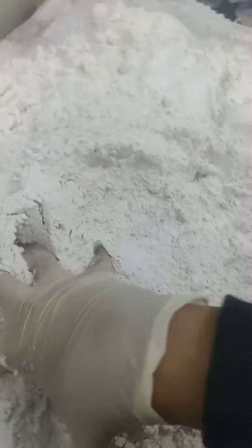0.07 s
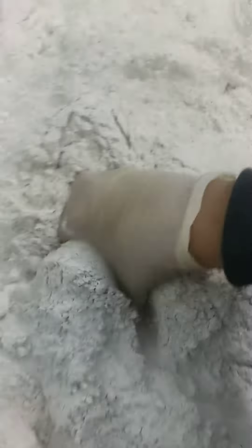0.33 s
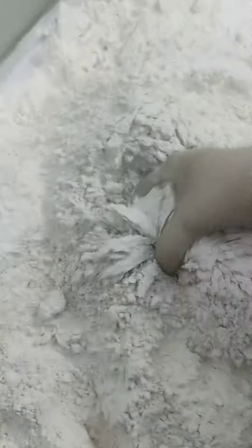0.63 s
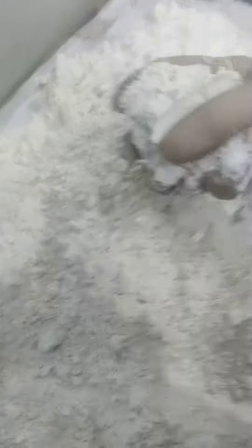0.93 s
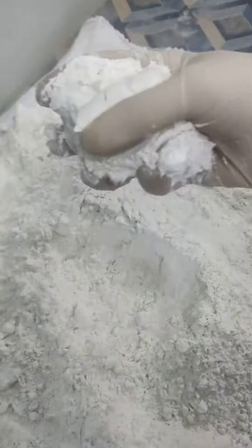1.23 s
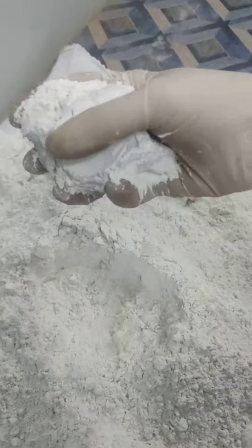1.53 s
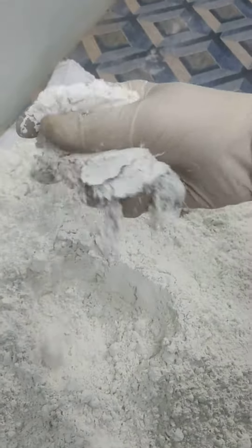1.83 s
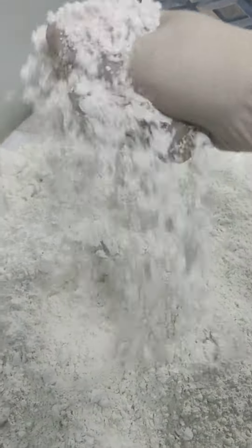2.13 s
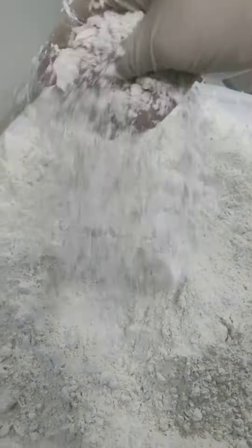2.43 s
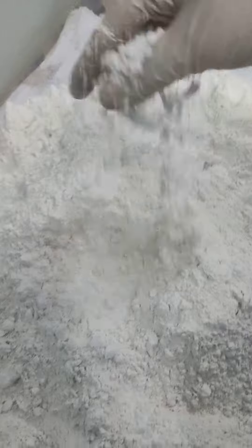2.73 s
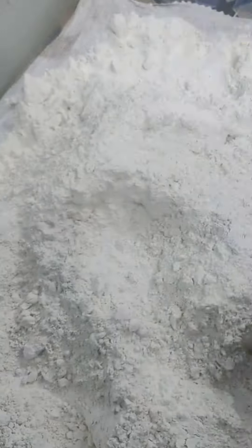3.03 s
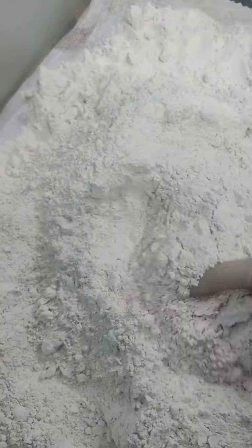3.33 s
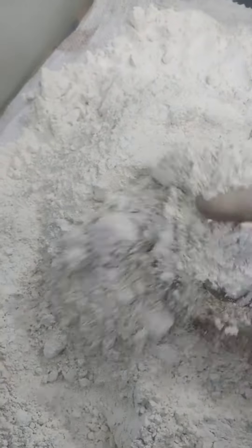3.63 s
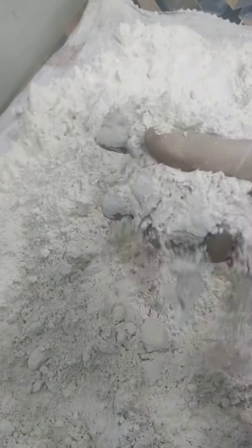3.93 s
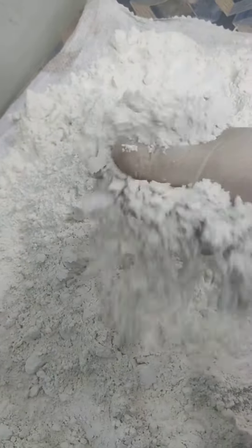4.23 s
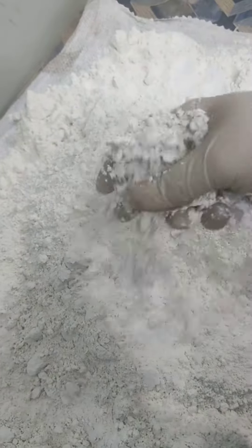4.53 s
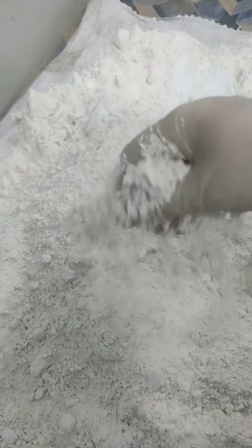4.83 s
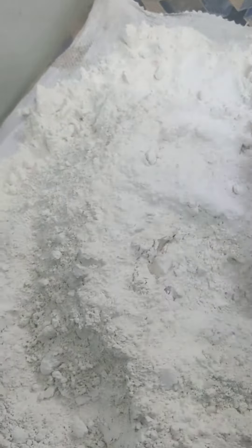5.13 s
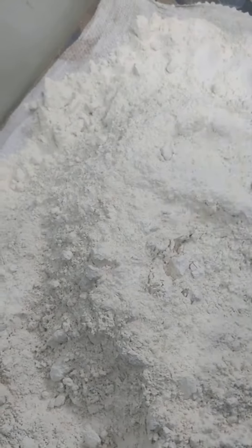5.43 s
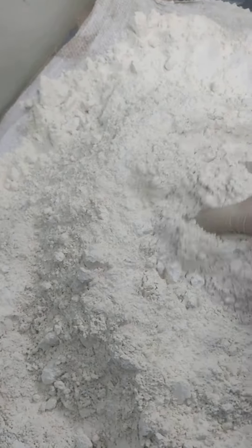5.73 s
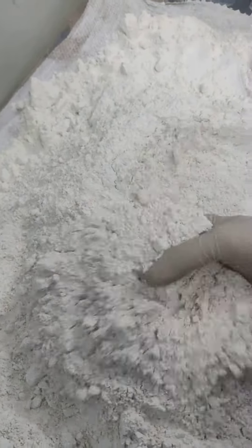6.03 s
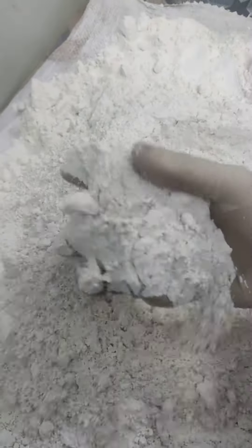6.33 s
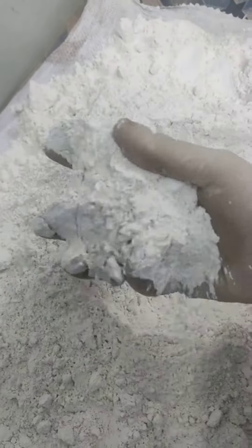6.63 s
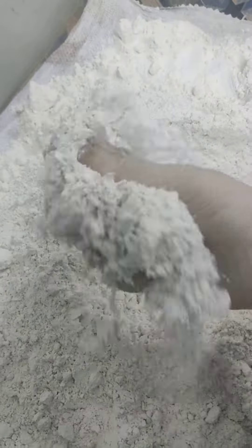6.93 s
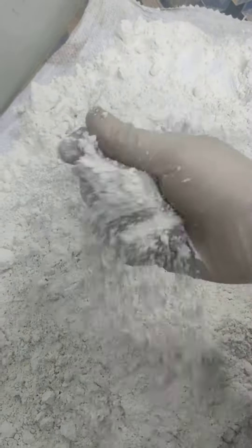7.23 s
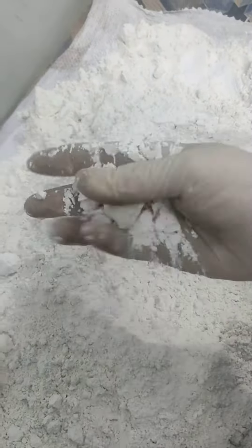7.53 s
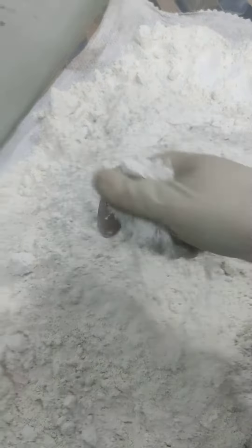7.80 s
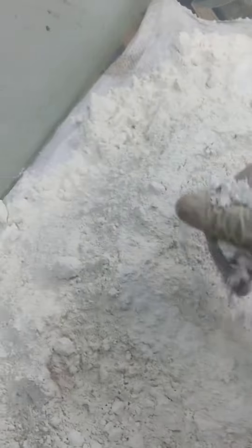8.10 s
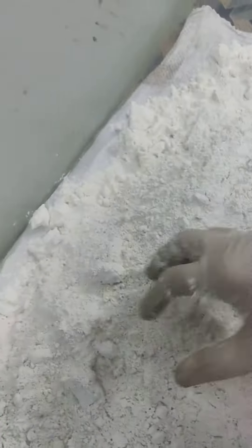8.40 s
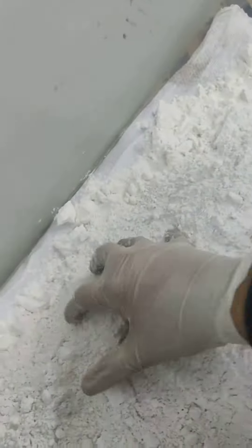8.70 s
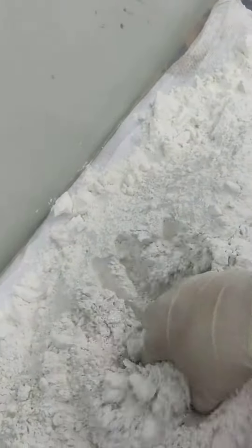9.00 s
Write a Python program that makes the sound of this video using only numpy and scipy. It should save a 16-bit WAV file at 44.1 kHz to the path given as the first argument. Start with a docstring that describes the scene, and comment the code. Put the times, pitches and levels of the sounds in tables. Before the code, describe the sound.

Scratchy, slightly squeaky finger rubs, ticks and dull bumps sound very close on the left microphone at first, then grow sparse. Behind them, fine powder hisses as a gloved hand sweeps through it, and handfuls slide off and land on the heap with a soft rush and little plops. A quick fingernail scrape comes just before a later pour. The setting is a quiet room with a low rumble and faint hum.

```python
"""Soft powder hisses over a low room rumble and hum as a gloved hand digs into a sack.
The hand lifts handfuls and lets them fall: sliding grains hiss, clumps land with a soft rush, lumps plop.
The other hand shifts its grip on a camera: skin and nail rub, bump and tick on the case,
right beside the left microphone."""
import sys
import numpy as np
from scipy import signal
from scipy.fft import rfft, irfft
from scipy.io import wavfile

SR = 44100
rng = np.random.default_rng(int(sys.argv[2]) if len(sys.argv) > 2 else 0)


def master_out(mix):
    """Clip the mix to full scale and print it as 16-bit PCM to the path in sys.argv[1]."""
    frames = np.transpose(np.atleast_2d(mix))
    ceiling = np.clip(frames, -1, 1)
    pcm = np.round(ceiling * 32767).astype(np.int16)
    wavfile.write(sys.argv[1], SR, pcm)


N = 408366
TIME_S = np.arange(N) / SR

# glove sweeps through the powder: peak_s, length_s, hiss_db, shove_db
GLOVE_SWEEPS = [(0.004, 0.14, -51, -49), (0.163, 0.54, -50, -55.5), (0.52, 0.24, -43, -51.5),
                (0.817, 0.45, -48, -62), (1.278, 0.28, -69, -59), (3.252, 0.27, -57, -54.5),
                (3.925, 0.14, -60.5, -66), (5.472, 0.13, -47, -60.5), (5.62, 0.23, -56.5, -62),
                (7.712, 0.097, -51.5, -86), (7.84, 0.47, -57, -85), (8.633, 0.15, -53, -62.5),
                (8.878, 0.87, -58.5, -79)]
# spectrum of powder hitting the heap: freq_hz, density_db
HEAP_SPECTRUM = [(120, -15), (380, 2.5), (560, 3), (760, 2), (950, 2.5), (1130, -3.5), (1400, -4),
                 (2500, -5.5), (3600, -10.5), (9000, -15.5), (15000, -94)]
# spectrum of the case body: freq_hz, density_db
CASE_SPECTRUM = [(60, -47), (200, -2), (350, 5), (600, 4.5), (950, 4.5), (1400, 1), (2100, 3), (2900, 1),
                 (4200, -12.5), (7000, -26), (15000, -103)]
# spectrum of ticks at the microphone port: freq_hz, density_db
TICK_SPECTRUM = [(300, 0.5), (2000, -2), (3500, -2.5), (5000, -0.5), (6500, 7), (7500, 7.5), (8500, 1.5),
                 (10000, -10.5), (15000, -12)]


def amp(db):
    """Decibels to gain."""
    return 10 ** (np.asarray(db) / 20)


def unit_rms(x):
    """Scale to an rms of one."""
    return x / np.sqrt(np.mean(x ** 2) + 1e-20)


def unit_energy(x):
    """Scale to an energy of one."""
    return x / (np.linalg.norm(x) + 1e-12)


def log_interp(table, hz):
    """Interpolate a table on a log-frequency axis."""
    freq_hz, value = np.transpose(table)
    return np.interp(np.log(hz + 1), np.log(freq_hz + 1), value)


def ring(spectrum, hz=1000, width_hz=500, lift_db=0, size=2048):
    """Minimum-phase impulse response of unit energy: a broad spectrum plus one resonance."""
    freq_hz = np.fft.rfftfreq(size, 1 / SR)
    gain = amp(log_interp(spectrum, freq_hz) + lift_db * np.exp(-((freq_hz - hz) / width_hz) ** 2))
    cepstrum = irfft(np.log(gain))
    cepstrum[1:size // 2] *= 2
    cepstrum[size // 2 + 1:] = 0
    return unit_energy(irfft(np.exp(rfft(cepstrum)))[:size // 2])


def tint(x, spectrum):
    """Filter by a spectrum; unit rms."""
    return unit_rms(signal.oaconvolve(x, ring(spectrum))[:N])


def wander(rate_hz):
    """Smooth random curve of bandwidth rate_hz; unit rms."""
    lowpass = np.exp(-(np.fft.rfftfreq(N, 1 / SR) / rate_hz) ** 2)
    return unit_rms(irfft(rfft(rng.standard_normal(N)) * lowpass, N))


def grains(per_s, spread_db):
    """Random impulses, sizes spread exponentially in dB; unit rms."""
    size = amp(spread_db * np.minimum(rng.exponential(1, N), 4))
    polarity = np.sign(rng.standard_normal(N))
    return unit_rms(polarity * size * (rng.random(N) < per_s / SR))


def add(mix, start_s, sound):
    """Mix a sound in at start_s."""
    part = mix[max(round(start_s * SR), 0):][:len(sound)]
    part += sound[:len(part)]


def room(rumble_db=-49, hiss_db=-73.5):
    """Low rumble, largely coherent at the two microphones, plus their own faint hiss."""
    # room rumble: freq_hz, density_db
    rumble_spectrum = [(15, -12), (28, -6.5), (55, 1.5), (78, -1), (100, -2.5), (122, -1), (150, 2),
                       (200, -1), (300, -7), (500, -12.5), (750, -20), (1050, -31), (2000, -32.5),
                       (4000, -67)]
    # likeness of left and right: freq_hz, coherence
    room_coherence = [(20, .72), (60, .96), (170, .95), (290, .78), (640, .5), (1400, 0)]
    # lean of the rumble: freq_hz, left_minus_right_db
    room_balance = [(60, 5.3), (200, 7.1), (700, 4.6), (2400, 1.1)]
    # microphone self-noise: freq_hz, density_db
    hiss_spectrum = [(1000, 4.5), (4000, -3.5), (6000, -9), (7700, -5), (10000, -16), (12500, -16),
                     (15000, -26)]
    freq_hz = np.fft.rfftfreq(N, 1 / SR)
    coherence = log_interp(room_coherence, freq_hz)
    lean_db = log_interp(room_balance, freq_hz) / 2
    left, independent = rfft(rng.standard_normal((2, N)))
    right = coherence * left + np.sqrt(1 - coherence ** 2) * independent
    pair = np.array([left * amp(lean_db), right * amp(-lean_db)])
    rumble = unit_rms(irfft(pair * amp(log_interp(rumble_spectrum, freq_hz)), N))
    hiss = np.array([tint(rng.standard_normal(N), hiss_spectrum) for _ in range(2)])
    return amp(rumble_db) * rumble + amp(hiss_db) * hiss


def hum(waver_db=2.0, drift_rad=0.7, right_db=-6):
    """Wavering mains hum and a few passing low tones."""
    # mains hum: pitch_hz, level_db
    mains_tones = [(99.5, -58), (150, -63.5)]
    # room tones that swell and fade: middle_s, length_s, pitch_hz, level_db
    passing_tones = [(0.86, 0.45, 187.1, -49), (1.3, 4.5, 179, -56.5), (4.424, 0.56, 218.6, -51.5),
                     (6.258, 1.76, 148.1, -51.5), (6.419, 0.38, 126, -49), (9.004, 1.2, 213.8, -52)]
    out = np.zeros(N)
    for hz, db in mains_tones:
        gain = amp(db + waver_db * wander(rate_hz=9.1))
        out += gain * np.sin(2 * np.pi * hz * TIME_S + drift_rad * wander(rate_hz=3.3))
    for middle_s, length_s, hz, db in passing_tones:
        gain = amp(db) * np.cos(np.pi * np.clip((TIME_S - middle_s) / length_s, -.5, .5))
        out += gain * np.sin(2 * np.pi * hz * TIME_S + drift_rad * wander(rate_hz=7.2))
    return np.sqrt(2) * out * amp([[0], [right_db]])


def flow_gain(flows, floor_db, rise_share=0.53, roundness=1.37):
    """Powder flows build and run out, adding in power over a floor of creeping loose powder."""
    power = amp(floor_db) ** 2
    for peak_s, length_s, db in flows:
        away = np.maximum((peak_s - TIME_S) / rise_share, (TIME_S - peak_s) / (1 - rise_share)) / length_s
        gain = amp(db) * np.exp(-np.minimum(away ** roundness, 20))
        power += gain ** 2
    return np.sqrt(power)


def sliding_powder(left_db=-4, waver_db=1.7, crumbs_db=-11.5):
    """Fine grains shear past each other and coarse crumbs tick apart; the flow wavers as lumps break."""
    # powder spilling off the hand: peak_s, length_s, level_db
    pours = [(1.94, 0.23, -57), (2.134, 0.15, -51), (2.357, 0.33, -55), (2.583, 0.34, -56),
             (2.85, 0.57, -57), (4.435, 0.55, -55), (4.76, 0.88, -59), (4.9, 0.23, -56.5),
             (7.07, 0.22, -52.5), (7.266, 0.48, -56.5), (8.146, 0.24, -53)]
    # fine grains: freq_hz, density_db
    fizz_spectrum = [(500, -33), (2000, -14), (4000, -10.5), (5500, -8), (6700, -3), (7700, 3),
                     (8600, -4.5), (9800, -20), (15000, -30)]
    # coarse crumbs: freq_hz, density_db
    crumb_spectrum = [(600, -8), (2000, -3.5), (4700, -1.5), (7500, 6.5), (10000, -15.5), (15000, -23)]
    crumbs = amp(crumbs_db) * tint(grains(per_s=60, spread_db=2.5), crumb_spectrum)
    fizz = np.array([tint(grains(per_s=14000, spread_db=-2.0), fizz_spectrum) for _ in range(2)])
    sweeps = [(peak_s, length_s, hiss_db) for peak_s, length_s, hiss_db, _ in GLOVE_SWEEPS]
    gain = flow_gain(sweeps + pours, floor_db=-71) * amp(waver_db * wander(rate_hz=21))
    return (fizz + crumbs) * gain * amp([[left_db], [0]])


def clump_gain(crumble_s=0.0044, steady_share=0.65):
    """Clumps land at random and crumble at once, over a steady stream."""
    decay = np.exp(-TIME_S[:SR // 20] / crumble_s)
    power = signal.oaconvolve(abs(grains(per_s=55, spread_db=-3.0)), decay)[:N]
    return np.sqrt(steady_share + (1 - steady_share) * abs(power) / power.mean())


def falling_powder(left_db=1, right_db=-1.5, waver_db=1.46, coarse_db=-6):
    """Shoved or dropped powder patters on the heap in soft clumps, without ringing."""
    # spilled powder reaching the heap: peak_s, length_s, level_db
    landings = [(2.07, 0.2, -58.5), (2.256, 0.44, -53.5), (2.45, 0.68, -69), (2.667, 0.44, -52),
                (2.956, 0.2, -64), (4.38, 0.72, -57), (4.526, 0.19, -51.5), (4.663, 0.07, -59),
                (5.046, 0.12, -54), (7.177, 0.061, -47), (7.247, 0.18, -51), (7.343, 0.093, -58),
                (8.128, 0.057, -72), (8.262, .07, -61.5)]
    patter = np.zeros((2, N))
    for side in patter:
        fine = grains(per_s=3500, spread_db=1.5)
        coarse = amp(coarse_db) * grains(per_s=110, spread_db=5.5)
        side += tint(fine + coarse, HEAP_SPECTRUM)
    shoves = [(peak_s, length_s, shove_db) for peak_s, length_s, _, shove_db in GLOVE_SWEEPS]
    gain = flow_gain(shoves + landings, floor_db=-72) * clump_gain() * amp(waver_db * wander(rate_hz=23))
    return patter * gain * amp([[left_db], [right_db]])


def resting_finger(body_db=-69, tick_db=-76):
    """A resting finger creeps on the case with a faint crackle."""
    creep = grains(per_s=300, spread_db=3)
    return amp(body_db) * tint(creep, CASE_SPECTRUM) + amp(tick_db) * tint(creep, TICK_SPECTRUM)


def grip_at(time_s):
    """The grip sets the resonance of the hollow under the finger, the scratch and the ticks' top octave."""
    # seat of the finger on the case: time_s, hollow_db, scratch_trim_db, top_octave_db
    grips = [(.13, 1.5, -2.5, 0), (.4, 8.5, -2, 7), (.9, 5, -6.5, 0), (1.04, 9, -3.5, 5), (1.2, 8, -6, 2),
             (1.601, 9.5, -4, -12), (1.8, 7.5, -4, 9), (2.3, 7.5, -6.5, -3), (2.6, 5, -2, -4),
             (2.9, 5.5, -8.5, 5), (3.7, 1.5, -4.5, -5), (5.4, 2, 0, -2), (6.2, 1, -2, -3), (6.8, 8, -2, 6),
             (8.7, -3, 8, 5)]
    times_s, *columns = np.transpose(grips)
    return [np.interp(time_s, times_s, column) for column in columns]


def disperse(response, travel_s, knee_hz=1300):
    """Low tones cross the case more slowly than high ones, so each slip chirps downward."""
    size = 2 * len(response)
    delay_s = travel_s * np.exp(-np.fft.rfftfreq(size, 1 / SR) / knee_hz)
    lag_turns = np.cumsum(delay_s) * SR / size
    return irfft(rfft(response, size) * np.exp(-2j * np.pi * lag_turns))


def resonate(x, hz, width_hz):
    """Narrow resonance following the pitch curve hz."""
    carrier = np.exp(2j * np.pi * np.cumsum(hz) / SR)
    pole = np.exp(-np.pi * width_hz / SR)
    return 2 * (carrier * signal.lfilter([1 - pole], [1, -pole], x / carrier)).real


def finger_rubs(body_db=-1.5, scratch_db=-3.5, squeak_db=-14, squeak_sag=0.16, waver_db=1.93,
                snag_db=-3, slip_share=0.43, rise_share=0.62, linger_s=0.02):
    """Skin sticks and slips: it rings the case, squeaks in the finger's hollow, scratches at the port."""
    # finger strokes on the case: middle_s, length_s, level_db, hollow_hz
    strokes = [(0.13, 0.073, -34.5, 900), (0.208, 0.053, -33.5, 1240), (0.246, 0.059, -30, 1460),
               (0.298, 0.038, -24, 1400), (0.347, 0.025, -37, 1350), (0.387, 0.039, -22, 1320),
               (0.441, 0.043, -31.5, 1370), (0.528, 0.049, -32, 1490), (0.587, 0.052, -26, 1440),
               (0.641, 0.022, -35, 1600), (0.671, 0.028, -26.5, 1450), (0.688, 0.016, -32.5, 1390),
               (0.71, 0.033, -35, 1300), (0.747, 0.041, -30, 1500), (0.796, 0.022, -32.5, 1400),
               (0.817, 0.031, -24, 1320), (0.862, 0.045, -27, 1520), (0.91, 0.032, -34, 1440),
               (0.941, 0.016, -33, 1350), (0.954, 0.02, -22.5, 1430), (1, 0.046, -22, 1380),
               (1.024, 0.031, -24, 1300), (1.05, 0.028, -22, 1430), (1.074, 0.054, -32.5, 1060),
               (1.153, 0.078, -29.5, 1040), (1.222, 0.028, -28.5, 1030), (1.281, 0.044, -40, 990),
               (1.33, 0.036, -37.5, 1150), (1.39, 0.0061, -46, 1400), (1.421, 0.037, -43.5, 1300),
               (1.492, 0.033, -36, 1210), (1.549, 0.046, -45.5, 1340), (1.6, 0.04, -36.5, 1180),
               (1.654, 0.062, -42.5, 1360), (1.689, 0.05, -34, 1400), (1.8, 0.069, -42.5, 1660),
               (1.889, 0.007, -32, 1570), (1.935, 0.026, -44, 1520), (1.999, 0.009, -45.5, 1580),
               (2.163, 0.015, -51, 1550), (2.271, 0.059, -45, 1490), (2.367, 0.03, -36.5, 1470),
               (2.532, 0.03, -35, 1400), (2.601, 0.023, -40, 1590), (2.628, 0.026, -35.5, 1230),
               (2.661, 0.03, -39.5, 1610), (2.72, 0.02, -49, 1450), (2.778, 0.057, -41, 1290),
               (2.836, 0.046, -39.5, 1140), (2.888, 0.037, -39.5, 1230), (2.95, 0.028, -42.5, 1210),
               (3.063, 0.031, -44, 1280), (3.16, 0.035, -47, 1370), (3.421, 0.035, -41.5, 1260),
               (3.545, .032, -40.5, 1270), (3.592, 0.015, -48, 1300), (3.673, 0.017, -38.5, 1750),
               (3.702, 0.028, -39.5, 1600), (3.8, 0.049, -44, 1490), (3.927, 0.043, -46, 1380),
               (4.897, 0.022, -46, 1400), (5.42, 0.056, -46.5, 1540), (5.796, 0.011, -50, 1600),
               (5.847, 0.032, -48, 1400), (5.966, 0.021, -51.5, 1500), (8.418, 0.041, -55.5, 1380)]
    friction = amp(waver_db * wander(rate_hz=68))
    slips = unit_rms(grains(per_s=2200, spread_db=1.5) * friction)
    grit = grains(per_s=4500, spread_db=7.0)
    snags = amp(snag_db) * grains(per_s=330, spread_db=2.0)
    roughness = unit_rms((grit + snags) * friction)
    scratch = tint(np.sqrt(slip_share) * slips + np.sqrt(1 - slip_share) * roughness, TICK_SPECTRUM)
    out = np.zeros(N)
    for middle_s, length_s, db, hz in strokes:
        start_s = max(middle_s - length_s / 2, 0)
        span = slice(int(start_s * SR), int((start_s + length_s + linger_s) * SR))
        corners_s = [0, rise_share * length_s, length_s, length_s + linger_s]
        pressure = np.interp(TIME_S[span] - start_s, corners_s, [0, 1, 0.077, 0]) ** 0.68
        hollow_db, scratch_trim_db, _ = grip_at(middle_s)
        case = disperse(ring(CASE_SPECTRUM, hz, width_hz=640, lift_db=hollow_db), travel_s=0.00402)
        creak = signal.fftconvolve(slips[span] * pressure, case)
        progress = np.minimum(TIME_S[:len(creak)] / length_s, 1) - .5
        squeak = resonate(creak, hz * (1 - squeak_sag * progress), width_hz=270)
        body = unit_energy(creak) + amp(squeak_db + hollow_db) * unit_energy(squeak)
        rasp = unit_energy(scratch[span] * pressure)
        strength = amp(db) * np.linalg.norm(pressure)  # longer strokes carry more energy
        add(out, start_s, strength * amp(body_db) * unit_energy(body))
        add(out, start_s, strength * amp(scratch_db + scratch_trim_db) * rasp)
    return out


def finger_bumps(width_hz=200):
    """Fingertip flesh shudders against the case in short, dull bursts."""
    # fingertip presses: middle_s, length_s, level_db, pitch_hz
    presses = [(0.13, 0.054, -43.5, 414), (0.437, 0.033, -40.5, 395), (1.078, 0.027, -49, 477),
               (1.15, 0.063, -36, 340), (1.214, 0.022, -38, 428), (1.487, 0.0188, -42, 414),
               (1.601, 0.03, -40.5, 433), (3.738, 0.0073, -45, 464), (6.796, .014, -50, 560),
               (6.882, 0.013, -36, 393), (8.99, 0.0095, -42, 395)]
    out = np.zeros(N)
    for middle_s, length_s, db, hz in presses:
        band = signal.butter(2, [hz - width_hz / 2, hz + width_hz / 2], "bandpass", fs=SR, output="sos")
        shudder = signal.sosfilt(band, rng.standard_normal(SR))[-int(length_s * SR):]
        window = signal.windows.tukey(len(shudder), .7)
        add(out, middle_s - length_s / 2, amp(db) * unit_rms(shudder) * window)
    return out


def finger_clicks(knock_gain_db=3.0, skid_db=-14, skid_s=0.005, grit_per_db=0.17, top_octave_hz=9200):
    """A sudden slip ticks at the port and knocks the case while the skin skids to a stop."""
    # single slips and taps: start_s, tick_db, knock_db, knock_hz
    clicks = [(0.2747, -7.5, -9.5, 1300), (0.3059, 3, -6.5, 1090), (.31, -8, -28, 1400),
              (.321, -14, -8, 1680), (0.34, -11, -15, 1510), (0.3939, -12, -3.5, 1160),
              (.734, -8.5, -13, 1490), (0.755, -17, -10.5, 1420), (1.0083, -11, -0.5, 1120),
              (1.0185, -7, -10, 1300), (1.0215, -15, -3, 1400), (1.0493, -18, -1, 1400),
              (1.0543, -10, -9, 1310), (1.071, -13, -11, 1290), (1.1675, -11, -11, 2600),
              (1.185, -19, -28, 1700), (1.191, -18, -5.5, 1240), (1.205, -12, -23, 1500),
              (1.2114, -17, -9.5, 860), (1.227, -30, -19, 2140), (1.278, -10.5, -18.5, 1250),
              (1.314, -13, -16, 1000), (1.3339, -11.5, -17, 1210), (1.415, -21.5, -15.5, 1300),
              (1.5945, -16, -10.5, 1230), (1.724, -7, -12, 1440), (1.7867, -5.5, -20, 2210),
              (1.793, -18, -11.5, 1700), (1.8127, -19, -15, 1450), (2.2659, -19.5, -19, 1600),
              (2.2796, -23, -20, 1600), (2.478, -26, -22.5, 1500), (2.552, -21, -25, 2010),
              (2.695, -26, -14.5, 1370), (3.007, -30, -28, 1400), (3.141, -33, -34, 2200),
              (3.3917, -23, -26, 1500), (3.611, -26.5, -27, 1300), (3.617, -29, -33, 1900),
              (3.6934, -24, -14, 1450), (3.7276, -19.5, -16.5, 900), (3.8145, -27, -22.5, 2100),
              (3.8394, -30, -28, 1100), (4.6185, -30, -25.5, 900), (4.705, -27, -50, 1400),
              (5.304, -21.5, -23.5, 1360), (5.7552, -30, -29.5, 1700), (5.967, -44, -27, 1800),
              (6.1862, -28, -27.5, 1400), (6.2401, -24, -36, 2000), (6.4846, -29, -43, 1500),
              (6.6583, -29, -37, 1500), (6.8809, -24, -18, 1000), (7.7744, -22.5, -50, 1400),
              (8.7118, -24.5, -32.5, 1400), (8.7951, -24.5, -47, 1400)]
    out = np.zeros(N)
    chatter = grains(per_s=5100, spread_db=6.5)
    decay = np.exp(-TIME_S[:SR // 20] / skid_s)
    for start_s, tick_db, knock_db, knock_hz in clicks:
        hollow_db, _, top_octave_db = grip_at(start_s)
        spectrum = [(hz, db + top_octave_db * (hz > top_octave_hz)) for hz, db in TICK_SPECTRUM]
        tick = ring(spectrum, hz=6330, width_hz=1800, lift_db=5.5)
        case = ring(CASE_SPECTRUM, knock_hz, width_hz=480, lift_db=5.0 + hollow_db)
        knock = disperse(case, travel_s=0.005006)
        skid = unit_energy(chatter[int(start_s * SR):][:len(decay)] * decay)
        grit_db = skid_db - grit_per_db * max(tick_db, knock_db)  # light slips are grittier
        slip = unit_energy(np.r_[1, amp(grit_db) * skid])
        add(out, start_s, amp(tick_db) * signal.fftconvolve(slip, tick))
        add(out, start_s, amp(knock_db + knock_gain_db) * signal.fftconvolve(slip, knock))
    return out


def falling_lumps(crumble_s=0.0049, debris_db=-1, right_db=-6):
    """Larger lumps hit the heap with a dull plop and fall apart at once."""
    # lump impacts: start_s, energy_db, pitch_hz
    lumps = [(2.167, -27, 1900), (2.205, -25, 700), (2.581, -19.5, 900), (3.984, -28, 794),
             (4.301, -30, 1900), (4.323, -33, 1800), (4.397, -25, 1290), (4.487, -28, 1400),
             (4.507, -26, 2400), (4.5277, -18, 560), (4.541, -29, 1700), (4.656, -30, 1800),
             (4.963, -25, 900), (4.972, -33, 960), (5.013, -28.5, 1420), (5.051, -23, 1500),
             (5.064, -26, 690), (5.175, -30, 1500), (5.273, -28.5, 1770), (7.175, -25, 700),
             (7.207, -25, 720), (7.229, -27, 1900), (7.298, -28, 1400), (8.114, -31.5, 2800),
             (8.251, -30, 960), (8.286, -34, 1200)]
    out = np.zeros((2, N))
    decay = np.exp(-TIME_S[:SR // 30] / crumble_s)
    for side in out:
        crumbs = grains(per_s=3900, spread_db=4)
        for start_s, db, hz in lumps:
            debris = unit_energy(crumbs[int(start_s * SR):][:len(decay)] * decay)
            collapse = np.r_[1, amp(debris_db) * debris]
            plop = ring(HEAP_SPECTRUM, hz, width_hz=0.45 * hz, lift_db=10.5)
            add(side, start_s, amp(db) * unit_energy(signal.fftconvolve(collapse, plop)))
    return out * amp([[0], [right_db]])


def nail_scrapes(waver_db=0.4, ring_db=-5, mode_width_hz=260, bite_exponent=0.42):
    """A nail bites, chatters over the case in a short, dense burst and sets it ringing faintly."""
    # fingernail scrapes: middle_s, length_s, level_db
    scrapes = [(3.369, 0.017, -50), (5.304, 0.025, -55.5), (5.364, 0.014, -54), (6.184, 0.04, -57),
               (6.24, 0.054, -61), (6.488, .017, -59), (6.75, 0.017, -55), (6.795, 0.0068, -30),
               (6.8015, 0.0067, -34.5), (6.813, 0.012, -47), (6.843, 0.041, -48.5), (6.8835, 0.0077, -38),
               (7.496, .018, -52), (9.146, 0.022, -56)]
    # nail on the case: freq_hz, density_db
    nail_spectrum = [(150, -8), (400, -1), (1250, -0.5), (1700, -6), (2300, -1.5), (4000, -6),
                     (5200, -11.5), (7400, 1), (10000, -17.5), (15000, -40)]
    # case modes under a nail: pitch_hz, level_db
    case_modes = [(550, 0), (860, 2), (1250, 5), (2200, 1), (3000, -5)]
    slips = unit_rms(grains(per_s=9000, spread_db=3.0) * amp(waver_db * wander(rate_hz=420)))
    pressure = np.zeros(N)
    for middle_s, length_s, db in scrapes:
        arch = np.clip(1 - (2 * (TIME_S - middle_s) / length_s) ** 2, 0, 1)
        pressure += amp(db) * arch ** bite_exponent
    ring_s = TIME_S[:1024]
    modes = sum(amp(db) * np.sin(2 * np.pi * hz * ring_s) for hz, db in case_modes)
    ringing = unit_energy(modes * np.exp(-np.pi * mode_width_hz * ring_s))
    case = unit_energy(ring(nail_spectrum) + amp(ring_db) * ringing)
    return signal.oaconvolve(slips * pressure, case)[:N]


def scene(leak_db=-38):
    """Room and powder reach both microphones; the grip is almost only on the left."""
    handling = finger_rubs() + finger_clicks() + nail_scrapes() + finger_bumps() + resting_finger()
    background = room() + hum()
    powder = sliding_powder() + falling_powder() + falling_lumps()
    return background + powder + handling * amp([[0], [leak_db]])


def record(dry, cutoff_hz=16100):
    """Steep low-pass band limit."""
    lowpass = signal.firwin(401, cutoff_hz, window=("kaiser", 9), fs=SR)
    return signal.oaconvolve(dry, lowpass[None], "same")


dry = scene()
out = record(dry)
master_out(out)
```